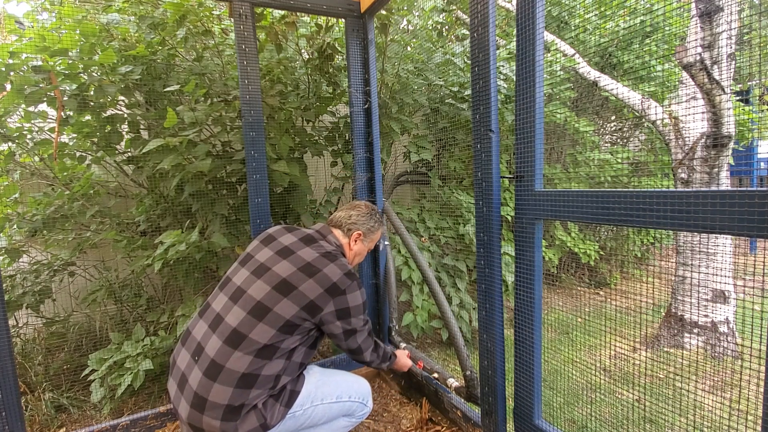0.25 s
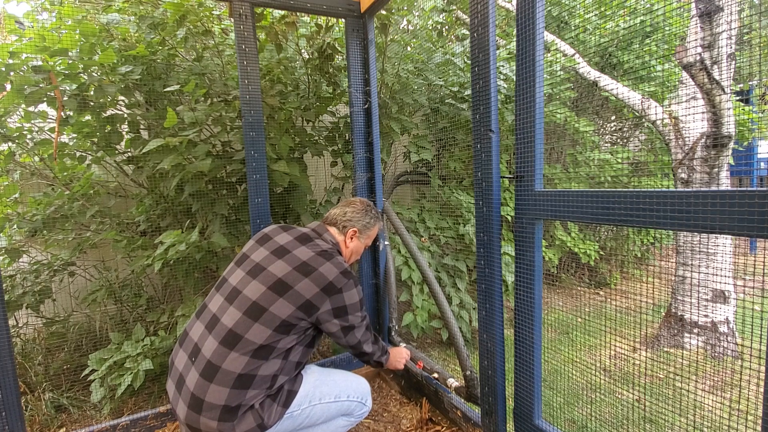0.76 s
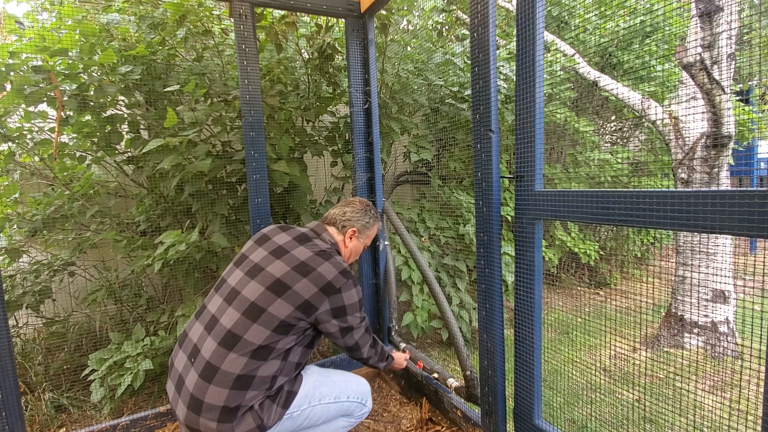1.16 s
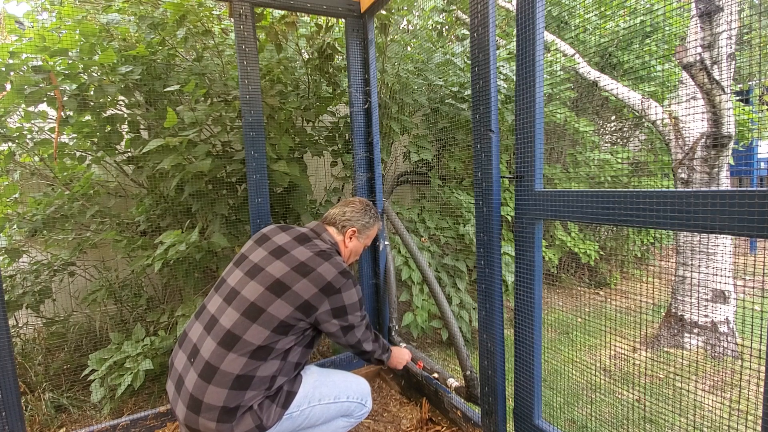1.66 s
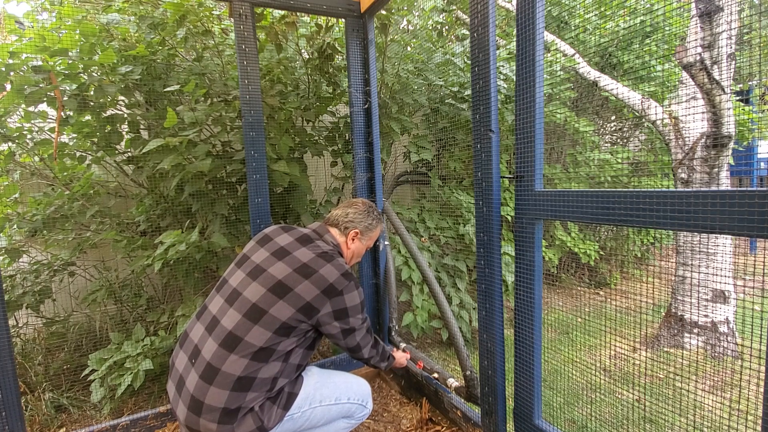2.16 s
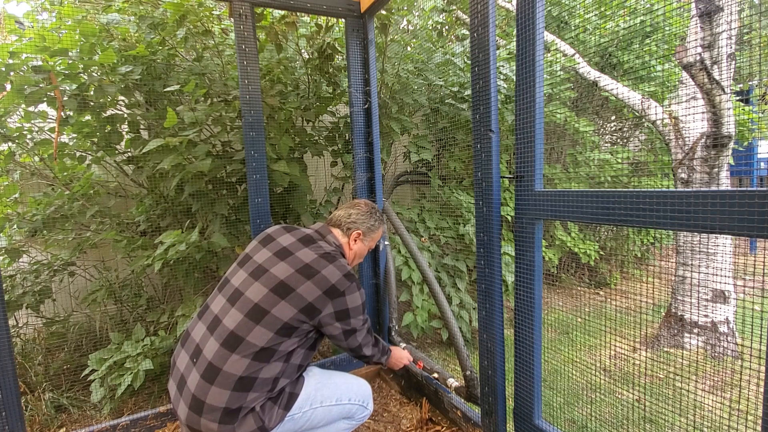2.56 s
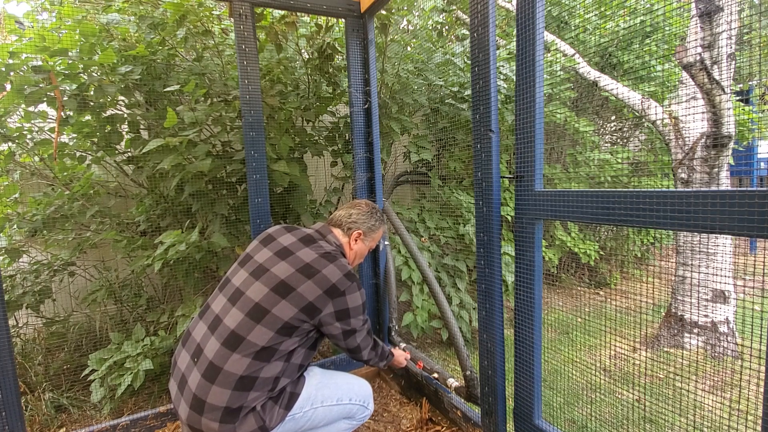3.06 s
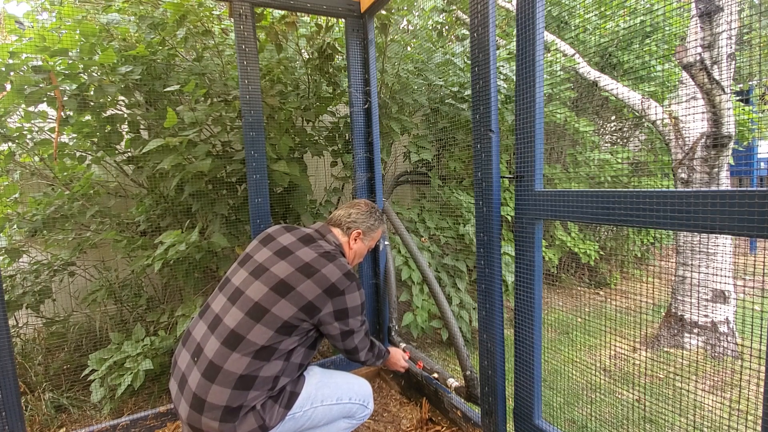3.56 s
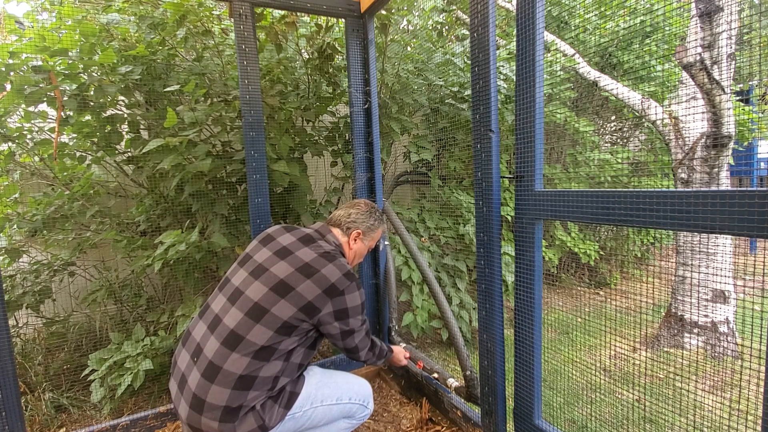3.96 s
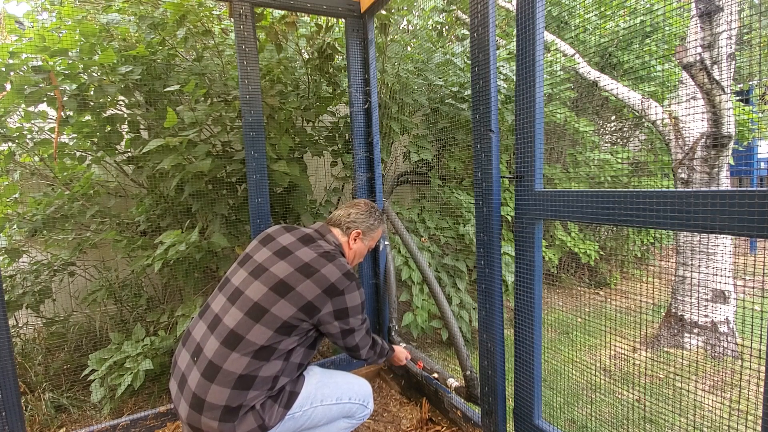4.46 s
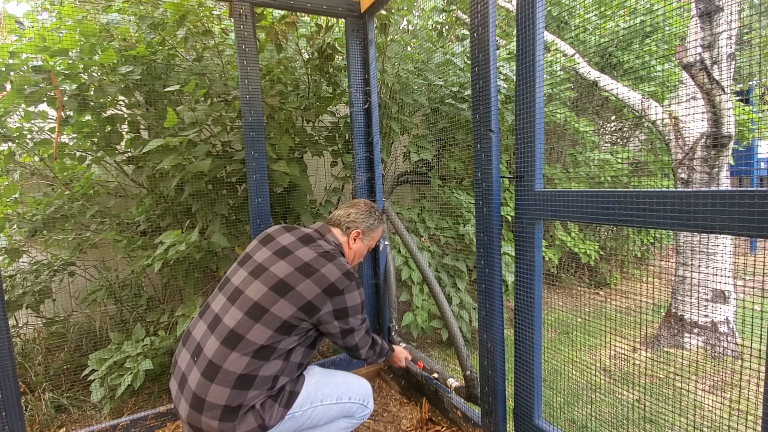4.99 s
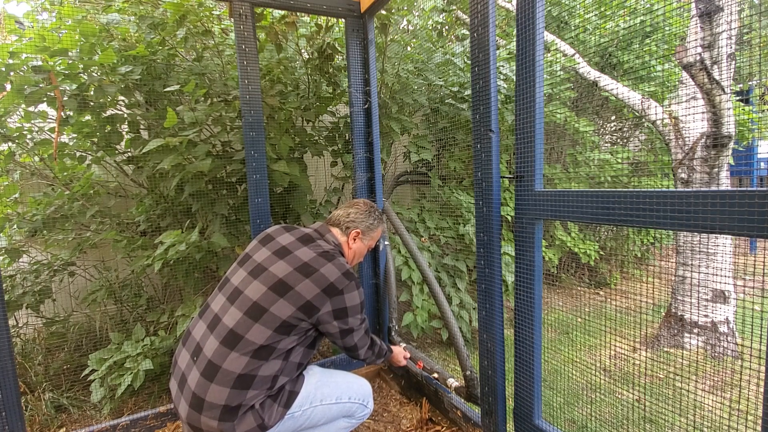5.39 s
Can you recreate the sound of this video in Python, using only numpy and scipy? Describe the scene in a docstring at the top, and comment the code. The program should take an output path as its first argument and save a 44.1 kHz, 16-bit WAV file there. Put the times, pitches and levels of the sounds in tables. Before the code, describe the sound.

Faint crackles and scrapes of dry wood chips come from the floor of an outdoor chicken run, over a steady low hum. Four short, harsh caws sound far away. From about halfway, hens close to the microphone give soft, hoarse clucks, until one stretches into a wavering, drawn-out call that cracks upward again and again and grows louder to the end.

```python
"""A low distant hum and the wash of a leafy garden. Someone at the foot of a wire chicken run rustles,
snaps and scrapes dry wood chips: grainy noise bursts with a woody body. Soft low bumps come and go.
A crow caws four times far off. Hens cluck softly, then one swells into a long whine that keeps breaking
between two registers. Each bird is a vibrating membrane, its harmonics shaped by the throat,
echoed by fence, wall and trees."""
import sys
import numpy as np
from scipy import signal
from scipy.fft import rfft, irfft
from scipy.io import wavfile
from scipy.ndimage import map_coordinates

SR = 44100
rng = np.random.default_rng(int(sys.argv[2]) if len(sys.argv) > 2 else 0)


def wav_record(signal):
    """Record a signal, one row per channel, as 16-bit PCM in the file named by sys.argv[1]."""
    frames = np.transpose(np.atleast_2d(signal))
    bounded = np.clip(frames, -1, 1)
    # unit amplitude maps onto the largest positive 16-bit level
    quanta = np.round(bounded * 32767).astype(np.int16)
    wavfile.write(sys.argv[1], SR, quanta)


N = 248283
TIME = np.arange(N) / SR

# distant hum: f/Hz, density/dB
HUM_SPECTRUM = [(15, -49.5), (30, -8), (48, 7), (68, 8.5), (100, 8), (130, -1.5), (180, -16), (300, -67.5)]
# garden wash: f/Hz, density/dB
GARDEN_SPECTRUM = [(100, -8), (180, 0), (300, -4), (550, -8), (950, -3), (1300, -10), (1800, -21),
                   (2600, -28), (6500, -35), (9000, -33), (16000, -36)]
# left-right likeness of noise: f/Hz, correlation
STEREO_CORRELATION = [(60, 1), (130, .93), (290, 0.69), (640, 0.4), (1400, -0.1), (3000, -0.085),
                      (16000, 0.17)]

# a hand pushes through the chips: t/s, swell/s, t60/s, level/dB
CHIP_RUSTLES = [(.11, 0.067, .33, -70.5), (0.631, 0.022, 0.3, -61), (1.86, .14, 0.38, -66),
                (2.53, 0.024, 0.76, -65), (2.936, 0.022, 0.64, -63.5), (3.83, 0.14, 0.54, -68.5),
                (4.375, 0.033, 0.69, -67.5), (4.738, 0.088, 0.87, -66.5)]
# wood on wood: t/s, level/dB, resonance/Hz, t60/s
CHIP_SCRAPES = [(0.385, -62, 1150, 1), (.386, -60.5, 2250, 0.44), (0.394, -76, 3060, 0.76),
                (.554, -72.5, 1880, 0.44), (0.647, -58.5, 1220, 0.28), (0.667, -60, 3550, 0.16),
                (0.845, -59, 3570, 0.41), (0.886, -62.5, 2480, 0.37), (1.258, -66.5, 4120, 0.32),
                (1.99, -69.5, 4060, 0.29), (2.952, -75, 3500, 0.44), (2.996, -65.5, 3500, 0.18)]
# a chip snaps, its neighbours settle: t/s, level/dB, t60/s
CHIP_SNAPS = [(0.463, -72, 0.4), (.846, -62, 0.52), (1.022, -69, 0.15), (1.261, -64.5, 0.41),
              (2.427, -70.5, 0.3), (2.791, -66, .49), (2.999, -60, 0.15), (3.282, -69.5, 1),
              (3.769, -69, .14), (4.988, -69, 0.43), (5.252, -55, 0.5), (5.326, -54.5, 0.14)]
# crisp top of a crunch: f/Hz, density/dB
CRISP_SPECTRUM = [(1500, 2), (3000, -39), (4000, -6.5), (6000, 1.5), (7400, 2), (8500, 9), (11000, 6),
                  (14000, 5), (16000, 4)]
# soft bumps: t/s, f/Hz, peak/dB
LOW_BUMPS = [(0.135, 76, -46), (1.023, 88.5, -43), (2.904, 66, -44), (5.088, 92, -44.5)]

# caws: t/s, length/s, top pitch/Hz, level/dB
CROW_CAWS = [(0.916, 0.13, 459.5, -62), (1.22, 0.1, 468.4, -58.5), (1.539, .11, 459.3, -58),
             (1.89, 0.11, 463, -59)]
# crow's throat: f/Hz, gain/dB
CROW_TRACT = [(450, -24), (950, -16.5), (1400, -1), (1850, -17), (2250, -20.5), (2900, -41), (4000, -30)]
# echo decay of fence, wall and trees: f/Hz, t60/s
ECHO_DECAY = [(300, 0.15), (1400, 0.54), (4000, 0.26)]
# clucks: t/s, length/s, start pitch/Hz, end pitch/Hz, level/dB, mouth resonance/Hz
HEN_CLUCKS = [(2.582, 0.062, 394, 381, -66.5, 780), (2.715, 0.092, 382, 437, -61, 445),
              (2.828, 0.26, 254, 304, -61.5, 1090), (3.014, 0.078, 252.8, 281, -53.5, 640),
              (3.101, 0.15, 258.6, 241.4, -60.5, 1270), (3.169, 0.15, 243.8, 298.7, -59.5, 750),
              (3.323, 0.013, 328, 350, -48.5, 1160), (3.332, 0.065, 404.5, 382.5, -53, 420),
              (3.536, 0.058, 272.8, 252, -52, 740), (3.731, 0.039, 249.3, 261.2, -51.5, 750),
              (3.974, 0.043, 230.3, 212, -52.5, 665), (4.093, 0.039, 340.6, 309, -58, 970),
              (4.161, 0.085, 219.9, 246.4, -59.5, 680), (4.278, 0.037, 408, 379, -61, 807),
              (4.411, 0.18, 392, 391, -59, 775), (4.898, 0.067, 424, 399, -58.5, 826),
              (4.973, 0.085, 682, 551, -49.5, 594)]
# hen's throat, beak nearly shut: f/Hz, gain/dB
HEN_TRACT = [(200, -3.5), (420, -5.5), (530, 3), (800, -0.5), (1000, -1.5), (1250, -7), (1700, -17),
             (3000, -86)]

# long call, lower register: t/s, pitch/Hz, fundamental/dB, octave/dB
LOWER_REGISTER = [(4.28, 422, -55, -69), (4.42, 458.5, -60.5, -68.5), (4.525, 469.5, -43.5, -52.5),
                  (4.6, 453, -55.5, -63), (4.7, 471, -45, -51.5), (4.755, 520, -42, -49.5),
                  (4.87, 513, -42.5, -45.5), (4.94, 538.7, -45, -43), (5.0, 485, -39.5, -40),
                  (5.03, 502, -40, -50.5), (5.06, 514.3, -41, -39), (5.2, 530.5, -43, -36.5),
                  (5.425, 536, -38.5, -29.5), (5.46, 606, -35, -36), (5.484, 564.5, -37.5, -36)]
# flips to the upper register, all brief but one: t/s, length/s, pitch/Hz, fundamental/dB
UPPER_REGISTER = [(4.533, .029, 676, -54), (4.721, .021, 664, -48.5), (4.784, .02, 683, -49.5),
                  (4.876, .036, 684, -46.5), (5.077, .02, 691, -50), (5.139, .028, 671, -45.5),
                  (5.216, .18, 692, -45.5), (5.44, .017, 662, -42.5), (5.482, .017, 730, -44.5)]
# harmonics 3-8 of the call: f/Hz, level/dB re octave
CALL_OVERTONES = [(1300, -13.5), (1600, -26.5), (2050, -40), (2700, -26.5), (3500, -36), (4200, -75),
                  (6000, -73)]
# how harshly the call is pressed: t/s, roughness (0-1)
CALL_ROUGHNESS = [(4.28, .85), (4.5, .55), (4.75, .4), (5.2, .32), (5.24, .24), (5.38, .22), (5.425, .2),
                  (5.47, .6), (5.5, .6)]
# the beak opens and lets out harmonics 4-8: t/s, gain/dB
BEAK_OPENING = [(4.3, -6), (5.198, -17), (5.32, 1), (5.38, 5), (5.411, -7.5), (5.47, 6), (5.5, 15)]
# air through the open beak: f/Hz, density/dB
RASP_SPECTRUM = [(400, 13.5), (700, 10), (1300, -13.5), (1700, -11), (2100, -19.5), (2600, -12),
                 (3500, -9.5), (4100, -53), (8000, -21)]


def from_db(db):
    """Decibels to gain."""
    return 10 ** (np.asarray(db) / 20)


def unit_rms(x):
    """Scale to rms 1."""
    return x / np.sqrt(np.mean(x ** 2) + 1e-20)


def at_hz(table, hz):
    """Read a table on a log-frequency axis."""
    table_hz, values = np.transpose(table)
    return np.interp(np.log(np.maximum(hz, 1)), np.log(table_hz), values)


def in_time(table):
    """Read each column of a curve at every sample."""
    times_s, *columns = np.transpose(table)
    return [np.interp(TIME, times_s, column) for column in columns]


def drift(rate_hz, size=N):
    """Smooth random wander, spread about 1."""
    knots = rng.standard_normal(int(size / SR * rate_hz * 2) + 3)
    return map_coordinates(knots, [np.arange(size) / SR * rate_hz * 2], order=3, mode="nearest")


def noise(spectrum):
    """Coloured stereo noise, centred bass, wide treble; rms 1."""
    hz = np.fft.rfftfreq(N, 1 / SR)
    alike = np.clip(at_hz(STEREO_CORRELATION, hz), -1, 1)
    mid, side = rfft(rng.standard_normal((2, N)))
    stereo = np.sqrt(1 + alike) * mid + np.sqrt(1 - alike) * side * [[1], [-1]]
    return unit_rms(irfft(stereo * from_db(at_hz(spectrum, hz)), N))


def bandpass(x, edges_hz, order):
    """Butterworth band-pass."""
    return signal.sosfilt(signal.butter(order, edges_hz, "band", fs=SR, output="sos"), x)


def burst(start_s, rise_s, t60_s):
    """Linear rise, exponential decay."""
    age_s = TIME - start_s
    return np.clip(age_s / rise_s, 0, 1) * from_db(-60 * np.clip((age_s - rise_s) / t60_s, 0, 2))


def gate(t, start_s, end_s, edge_s):
    """Smooth edges centred on start and end."""
    inside_s = np.minimum(t - start_s, end_s - t)
    return np.sin(np.pi / 2 * np.clip(inside_s / edge_s + .5, 0, 1)) ** 2


def around(start_s, end_s, margin_s=.03):
    """Sample indices of a note plus margin."""
    return np.arange(int((start_s - margin_s) * SR), min(N, int((end_s + margin_s) * SR)))


def background(hum_db=-56.5, garden_db=-63.5):
    """Lumpy low hum and soft garden wash."""
    fade_in = np.minimum(TIME / .01, 1)
    hum = from_db(hum_db + .91 * drift(4.8)) * noise(HUM_SPECTRUM) * fade_in
    garden = from_db(garden_db + .3 * drift(2.18)) * noise(GARDEN_SPECTRUM)
    return hum + garden


def chips(body_db=-13, body_hz=3670, crack_db=-2, crack_t60_s=.013):
    """Dry chips give way in grainy bursts: crisp top, hollow body. Scrapes have one resonance each."""
    white = noise([(500, 0), (16000, 0)])

    def wood(hz):
        return unit_rms(bandpass(white, hz * np.exp([-.099, .099]), order=1))

    snaps = [from_db(db) * (burst(t, .002, t60_s) + from_db(crack_db) * burst(t, 1 / SR, crack_t60_s))
             for t, db, t60_s in CHIP_SNAPS]
    rustles = [from_db(db) * burst(t, swell_s, t60_s) for t, swell_s, t60_s, db in CHIP_RUSTLES]
    envelope = np.sqrt(sum(level ** 2 for level in snaps + rustles))
    scrapes = sum(from_db(db) * burst(t, .009, t60_s) * wood(hz) for t, db, hz, t60_s in CHIP_SCRAPES)
    grains = unit_rms(from_db(.5 * drift(200) + 3 * drift(1800)))   # clumps of tiny snaps
    crunch = noise(CRISP_SPECTRUM) + from_db(body_db) * wood(body_hz)
    return grains * (envelope * crunch + scrapes)


def bumps(length_s=.061):
    """A few slow cycles each, felt more than heard."""
    out = np.zeros(N)
    for start_s, hz, db in LOW_BUMPS:
        age_s = TIME - start_s
        window = np.sin(np.pi * np.clip(age_s / length_s, 0, 1)) ** 2
        out += from_db(db) * np.sin(2 * np.pi * hz * age_s) * window
    return out


def syrinx(pitch_hz, harmonics_db, jitter, shimmer, flutter_hz):
    """Vibrating membrane: harmonics unsteady in pitch (jitter) and strength (shimmer)."""
    size = len(pitch_hz)
    unsteady_hz = pitch_hz * (1 + jitter * drift(flutter_hz, size))
    phase = 2 * np.pi * np.cumsum(unsteady_hz) / SR + rng.uniform(0, 2 * np.pi)
    shared = drift(flutter_hz, size)
    voice = np.zeros(size)
    for k, db in enumerate(harmonics_db, 1):
        flutter = 1 + shimmer * (shared + drift(flutter_hz, size))
        voice += from_db(db) * flutter * np.sin(k * phase)
    return np.sqrt(2) * voice


def crow(sag=.061):
    """Each caw is a harsh arch of pitch that sags at its end."""
    out = np.zeros(N)
    for start_s, length_s, top_hz, db in CROW_CAWS:
        end_s = start_s + length_s
        at = around(start_s, end_s)
        progress = (TIME[at] - start_s) / length_s
        pitch_hz = top_hz * (1 - sag * (2 * progress - .75) ** 2)
        harmonics_db = [at_hz(CROW_TRACT, k * pitch_hz) for k in range(1, 9)]
        voice = syrinx(pitch_hz, harmonics_db, jitter=.027, shimmer=.45, flutter_hz=140)
        out[at] += from_db(db) * unit_rms(voice) * gate(TIME[at], start_s, end_s, edge_s=.06)
    return out


def yard(x, wet_db, right_lag_s, left_bias_db, t60_scale):
    """Direct sound, later on the right, plus scattered echoes dying band by band."""
    t = TIME[:SR // 2]
    edges_hz = np.geomspace(150, 9600, 7)
    tail = 0
    for low_hz, high_hz in zip(edges_hz, edges_hz[1:]):
        band = bandpass(rng.standard_normal((2, len(t))), [low_hz, high_hz], order=2)
        t60_s = t60_scale * at_hz(ECHO_DECAY, np.sqrt(low_hz * high_hz))
        tail = tail + band * from_db(-60 * t / t60_s)
    tail = unit_rms(tail * (t > .006))   # gap before the first echo
    tail *= np.sqrt(2 * edges_hz[-1] / SR / len(t))   # near unity gain in band
    tail = tail + .06 * tail[::-1]   # crossfeed
    echoes = signal.fftconvolve(x[None], tail, axes=1)[:, :N]
    direct = np.array([x, np.interp(TIME - right_lag_s, TIME, x)])
    return (direct + from_db(wet_db) * echoes) * from_db([[left_bias_db / 2], [-left_bias_db / 2]])


def clucks(mouth_db=6, mouth_width_hz=130, fade_db=-4, typical_hz=268.6, typical_s=.07):
    """Short glides through throat and mouth, hoarse when low and long, fading as air runs out."""
    out = np.zeros(N)
    for start_s, length_s, start_hz, end_hz, db, mouth_hz in HEN_CLUCKS:
        end_s = start_s + length_s
        at = around(start_s, end_s)
        progress = np.clip((TIME[at] - start_s) / length_s, 0, 1)
        pitch_hz = start_hz + (end_hz - start_hz) * progress
        lowness = min(1, typical_hz / pitch_hz.mean())
        rough = min(1, .5 * lowness ** 2.23 * (length_s / typical_s) ** .57)
        harmonics_hz = np.outer(np.arange(1, 11), pitch_hz)
        resonance_db = mouth_db / (1 + ((harmonics_hz - mouth_hz) / mouth_width_hz) ** 2)
        harmonics_db = at_hz(HEN_TRACT, harmonics_hz) + resonance_db
        voice = syrinx(pitch_hz, harmonics_db, jitter=.1 * rough, shimmer=.85 * rough, flutter_hz=90)
        level = from_db(db + fade_db * (progress - .5))
        out[at] += level * unit_rms(voice) * gate(TIME[at], start_s, end_s, edge_s=.009)
    return out


def long_call(rasp_db=-12.5, break_db=-6, recovery_s=.009, bloom_db_per_s=400, sag_hz_per_s2=600):
    """A hen's whine flips register; the octave swells with effort and lifts the overtones."""
    out = np.zeros(N)
    air = noise(RASP_SPECTRUM)[0]
    lower_hz, lower_db, lower_octave_db = in_time(LOWER_REGISTER)
    rough, = in_time(CALL_ROUGHNESS)
    beak_db, = in_time(BEAK_OPENING)
    waver = 1 + .04 * rough * drift(14)

    def note(at, start_s, end_s, pitch_hz, fundamental_db, octave_db):
        """One unbroken note; air escapes in each open phase."""
        overtones_db = [octave_db + at_hz(CALL_OVERTONES, k * pitch_hz) + beak_db[at] * (k > 3)
                        for k in range(3, 9)]
        voice = syrinx(pitch_hz * waver[at], [fundamental_db, octave_db, *overtones_db],
                       jitter=.077 * rough[at], shimmer=.41 * rough[at], flutter_hz=79.8)
        rasp = from_db(rasp_db) * rough[at] * np.maximum(voice, 0) * air[at]
        return (voice + rasp) * gate(TIME[at], start_s, end_s, edge_s=.0065)

    start_s = LOWER_REGISTER[0][0]
    for flip_s, length_s, upper_hz, upper_db in UPPER_REGISTER:
        # lower register: dips at both ends
        at = around(start_s, flip_s)
        inside_s = np.maximum(np.minimum(TIME[at] - start_s, flip_s - TIME[at]), 0)
        dip_db = break_db * np.exp(-inside_s / recovery_s)
        out[at] += note(at, start_s, flip_s, lower_hz[at],
                        lower_db[at] + dip_db, lower_octave_db[at] + dip_db)
        # upper register: pitch sags, octave blooms mid-note
        end_s = flip_s + length_s
        at = around(flip_s, end_s)
        held_s = np.clip(TIME[at] - flip_s, 0, length_s)
        pitch_hz = upper_hz - sag_hz_per_s2 * held_s ** 2
        bloom_db = np.minimum(-19 + bloom_db_per_s * np.minimum(held_s, length_s - held_s), -.5)
        out[at] += note(at, flip_s, end_s, pitch_hz, upper_db, upper_db + bloom_db)
        start_s = end_s
    return out


def scene():
    """Hens near, crow far, chips and bumps over the background."""
    birds = yard(long_call(), wet_db=-7, right_lag_s=.00017, left_bias_db=-2, t60_scale=.31)
    birds += yard(clucks(), wet_db=-5.5, right_lag_s=.00027, left_bias_db=-1.5, t60_scale=.88)
    birds += yard(crow(), wet_db=-3, right_lag_s=.0001, left_bias_db=-2.5, t60_scale=1.2)
    return birds + chips() + bumps() + background()


def record(dry):
    """Steep low-pass at 15.9 kHz."""
    return signal.sosfilt(signal.ellip(10, .1, 70, 15900, fs=SR, output="sos"), dry)


dry = scene()
out = record(dry)
wav_record(out)
```